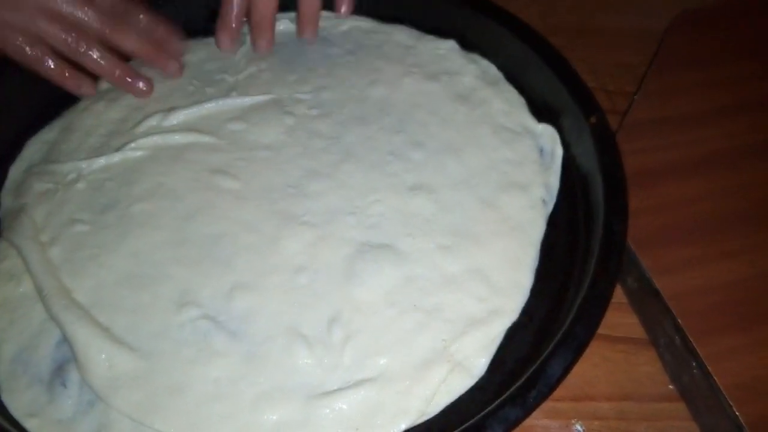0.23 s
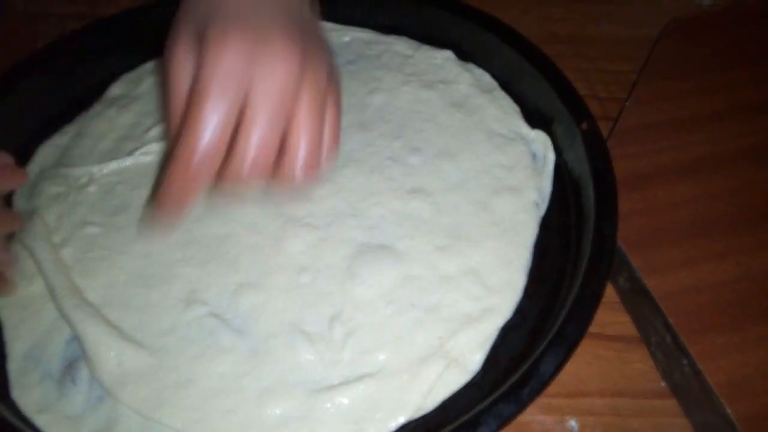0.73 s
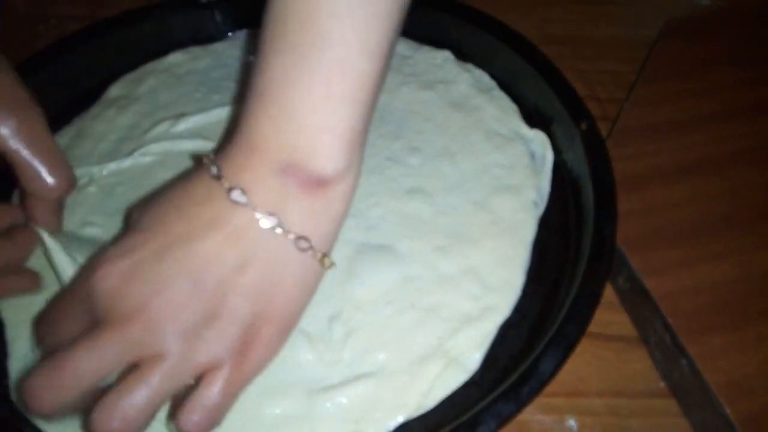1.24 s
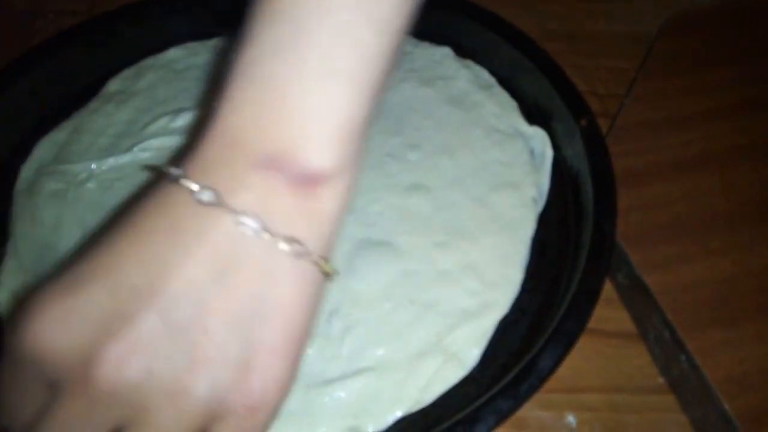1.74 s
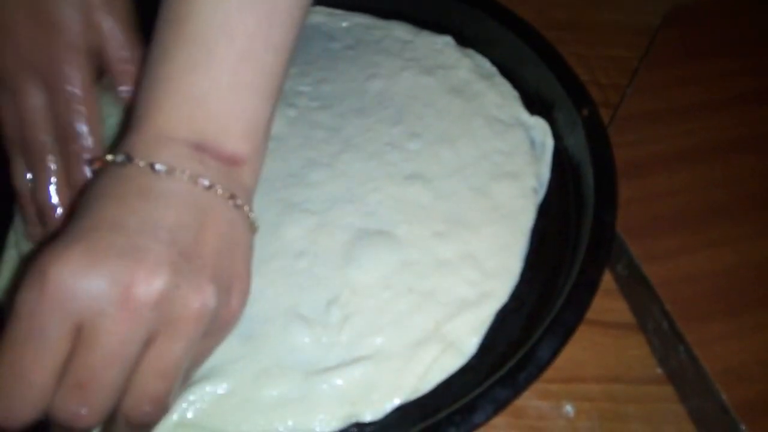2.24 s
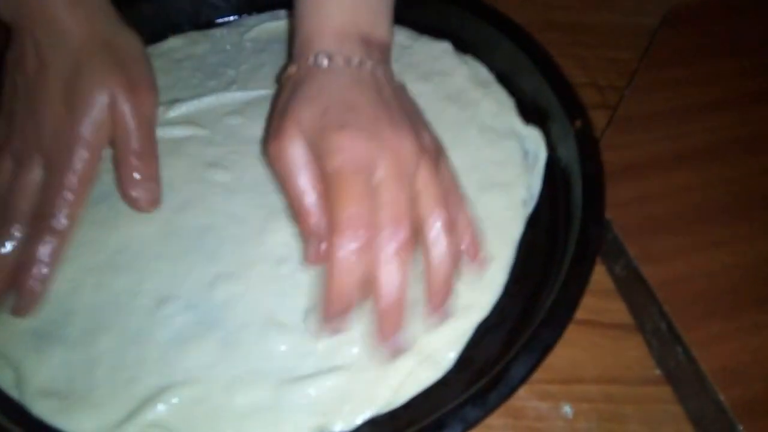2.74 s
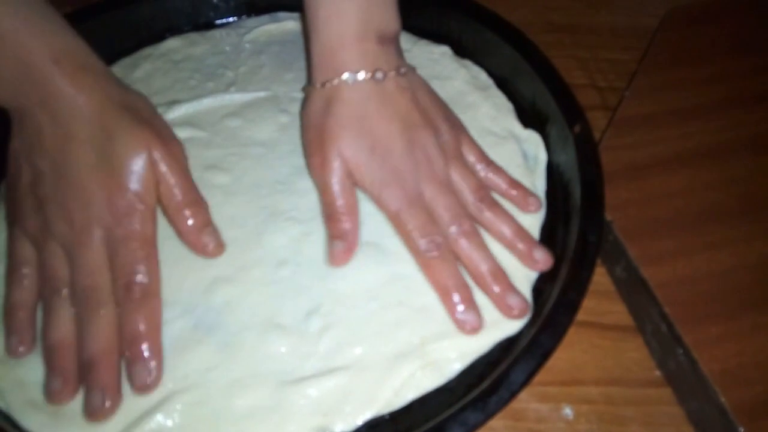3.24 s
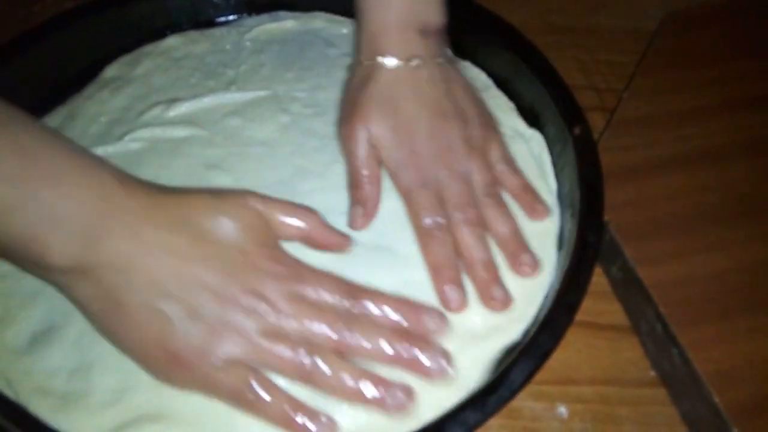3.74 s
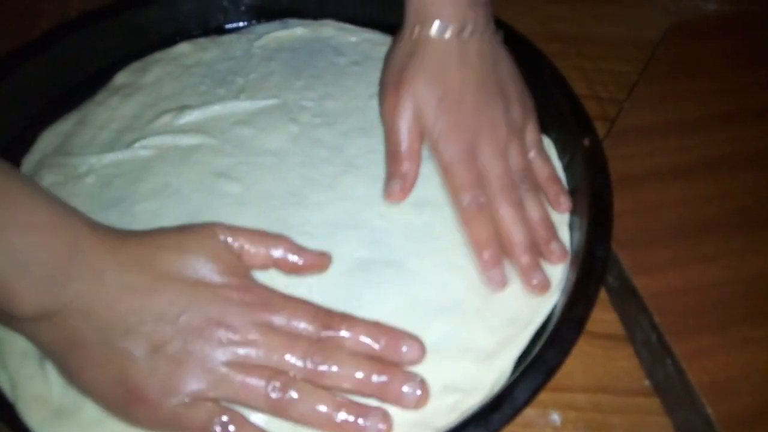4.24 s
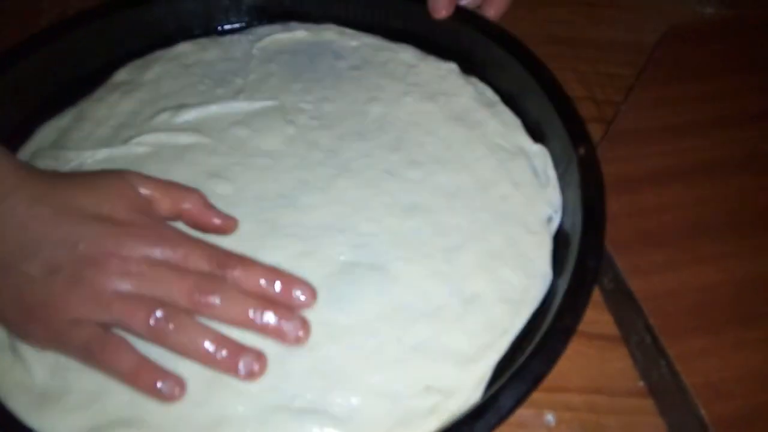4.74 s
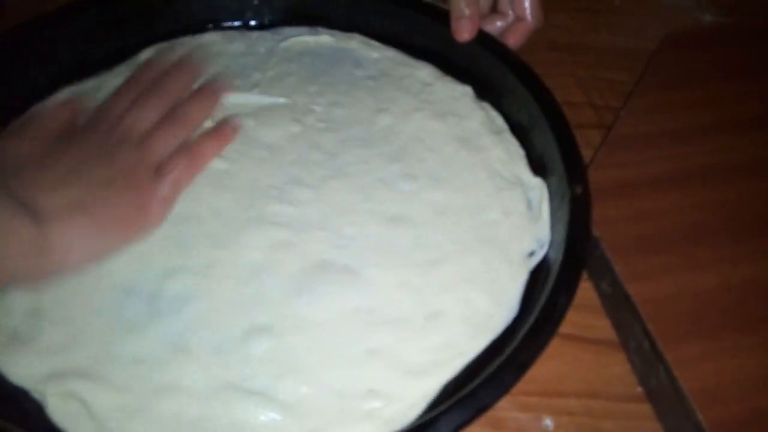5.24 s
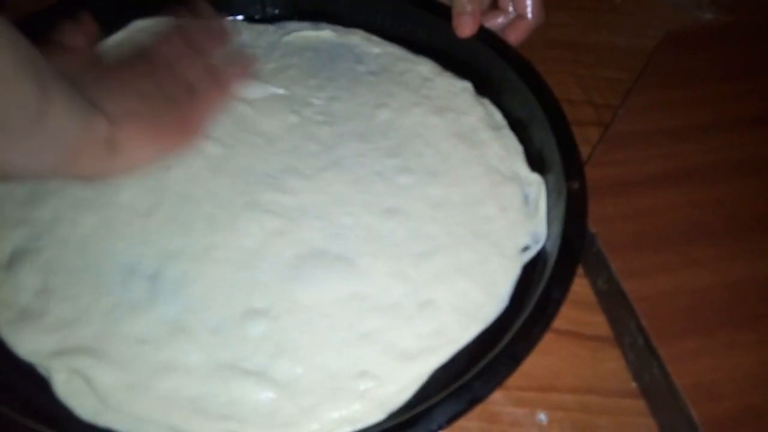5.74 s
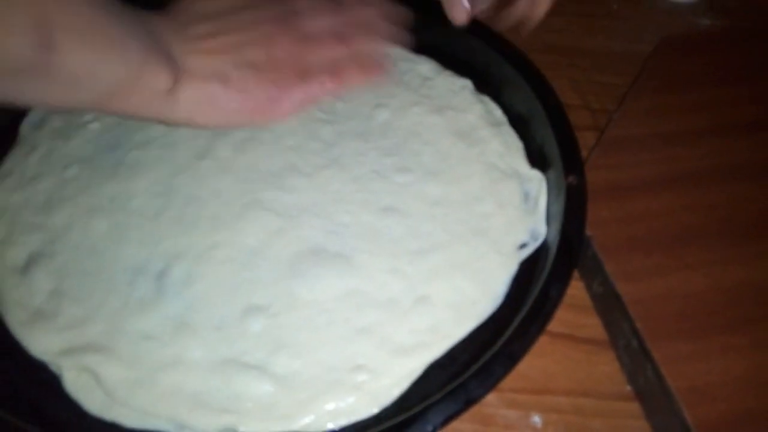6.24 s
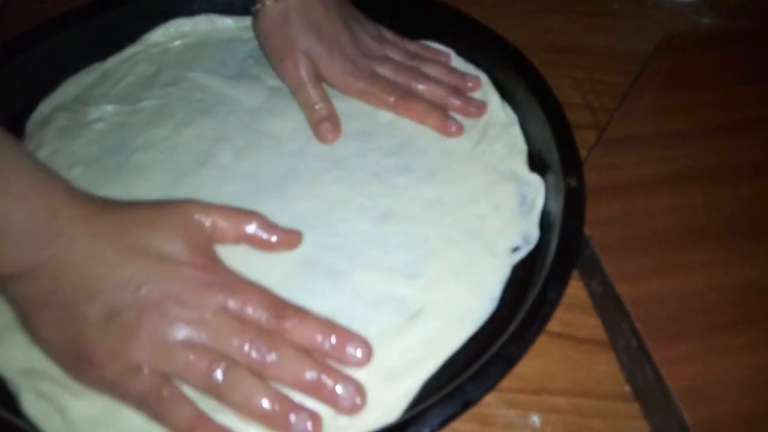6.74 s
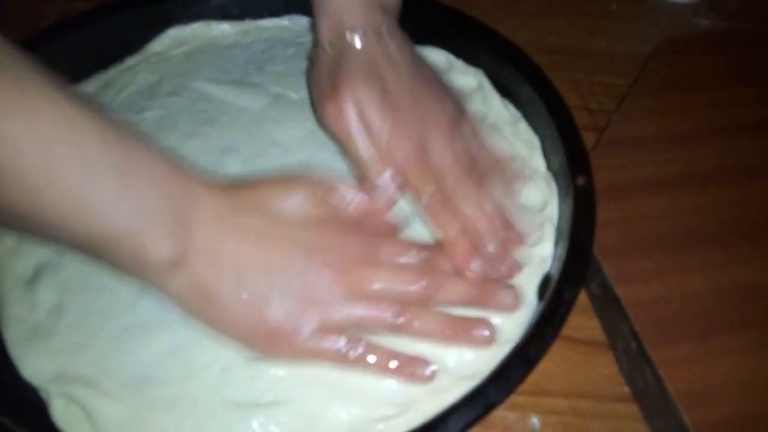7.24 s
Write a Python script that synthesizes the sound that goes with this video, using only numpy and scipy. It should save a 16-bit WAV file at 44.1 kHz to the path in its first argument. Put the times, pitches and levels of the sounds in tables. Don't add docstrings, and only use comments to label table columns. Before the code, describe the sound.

Close, muffled phone sound over a faint room rumble and hiss. Quiet fingertip taps and soft dough presses come first, spaced out. Then brisk, hollow, wet slaps snap from cupped oily palms, each with a low wooden and metallic thump and a brief bright room echo. A dense flurry gives way to uneven pats, small sticky snaps, one tiny bracelet clink and a last firm slap.

```python
import sys
import numpy as np
from scipy import signal
from scipy.fft import rfft, irfft
from scipy.io import wavfile

SR = 44100
rng = np.random.default_rng(int(sys.argv[2]) if len(sys.argv) > 2 else 0)


def materialize(psi):
    bounded = np.clip(np.atleast_2d(psi).T, -1, 1)
    quanta = np.round(bounded * 32767).astype(np.int16)
    wavfile.write(sys.argv[1], SR, quanta)


def volts(x):
    e = np.asarray(x, float) / 20
    return 10 ** e


N = 330597


def at_hz(points, hz):
    points = np.array(points)
    return np.interp(np.log(hz), np.log(points[:, 0]), points[:, 1])


def rms_one(x):
    return x / np.sqrt(np.mean(x ** 2) + 1e-20)


def band(x, low_hz, high_hz):
    return signal.sosfilt(signal.butter(2, [low_hz, high_hz], "band", fs=SR, output="sos"), x)


def resonance(x, hz, width_hz):
    r = np.exp(-np.pi * width_hz / SR)
    poles = [1, -2 * r * np.cos(2 * np.pi * hz / SR), r * r]
    return signal.lfilter([(1 - r * r) / 2, 0, (r * r - 1) / 2], poles, x)


def ring(force, hz, t60_s):
    r = volts(-60 / (t60_s * SR))
    w = 2 * np.pi * hz / SR
    return signal.lfilter([0, np.sin(w)], [1, -2 * r * np.cos(w), r * r], force + 1e-18)


def add(track, start_s, piece):
    i = round(start_s * SR)
    track[i:i + len(piece)] += piece[:N - i]


def contacts():
    # start in seconds, cupped-air level in dB, sharp level in dB,
    # cupped-air pitch in Hz, squirt length in seconds.
    palm_slaps = [(2.8343, -41.5, -34, 1670, 0.0063), (3.5273, -27.5, -20.5, 1690, 0.0034),
                  (3.7727, -25, -15, 1300, 0.003), (4.019, -25.5, -16, 980, 0.00046),
                  (4.2406, -26, -20, 1000, 0.0084), (4.4801, -34.5, -24.5, 1820, 0.0072),
                  (4.4927, -21.5, -19, 1340, .0012), (4.626, -19, -10.5, 1170, 0.00087),
                  (4.667, -24.5, -13, 1190, 0.0029), (4.6986, -27.5, -26, 1120, 0.0024),
                  (4.861, -37, -33.5, 1200, 0.0026), (4.9415, -21.5, -37, 1860, 0.00071),
                  (5.0814, -35, -26.5, 1180, .0021), (5.3406, -25, -26, 1404, 0.0021),
                  (5.5017, -30.5, -24, 1840, 0.0018), (5.6, -27, -25.5, 1220, .002),
                  (5.7505, -29.5, -23, 1690, 0.003), (5.8533, -26.5, -16.5, 1240, 0.0016),
                  (6.0006, -35, -34.5, 1780, 0.0007), (6.0826, -34, -31, 1650, 0.0082),
                  (6.5035, -35, -24.5, 1660, 0.0063), (6.7466, -35.5, -28.5, 2000, 0.0032),
                  (7.052, -31, -26, 1760, 0.0036), (7.3145, -21.5, -13, 1210, 0.00082)]
    # start in seconds, cupped-air level in dB,
    # sharp level in dB, cupped-air pitch in Hz.
    finger_taps = [(0.3293, -55, -54, 1870), (1.1475, -47.5, -49, 1480), (1.916, -45.5, -42, 1500),
                   (2.53, -46, -43.5, 1530), (3.24, -50, -63.5, 2380), (3.897, -54, -38.5, 1390),
                   (4.262, -26.5, -35, 970), (4.4028, -38, -35, 1700), (4.6194, -31, -44, 1100),
                   (4.6344, -18.5, -22, 1000), (4.7173, -29.5, -34.5, 980), (4.8908, -43.5, -41, 1224),
                   (4.912, -54, -55, 1210), (4.951, -36.5, -38, 1790), (5.11, -48, -56, 1240),
                   (5.3258, -38.5, -37, 1420), (5.4933, -37.5, -28, 2330), (5.5787, -40.5, -50, 1050),
                   (5.7046, -40.5, -29.5, 1820), (5.7837, -36.5, -53, 1960), (5.8252, -36, -30.5, 1800),
                   (5.945, -40, -60, 1410), (6.2276, -44.5, -60, 1320), (6.5069, -42, -32, 1230),
                   (6.556, -37.5, -41, 1610), (6.7855, -39.5, -42, 1410), (6.9581, -39, -60, 1280),
                   (6.983, -45, -60, 1420), (7.2476, -37.5, -43.5, 1280), (7.444, -50.5, -51, 1070)]
    # start in seconds, level in dB, pitch in Hz.
    oil_snaps = [(0.5751, -45.5, 4860), (0.7248, -53.5, 3870), (2.387, -51, 4570), (2.953, -45.5, 2960),
                 (3.005, -46.5, 3960), (3.0907, -43.5, 3760), (3.259, -38.5, 5030), (3.2903, -40, 3500),
                 (3.67, -49, 5040), (3.943, -48, 3240), (4.128, -47.5, 4900), (4.152, -46, 4820),
                 (4.2705, -31.5, 4430), (4.3144, -45, 3510), (6.1998, -47, 4470), (6.2397, -49, 4890),
                 (6.2593, -47, 4600), (6.5127, -28.5, 4700), (6.6076, -39, 3500), (6.6413, -41, 5150),
                 (6.7518, -28.5, 4060), (6.8394, -43, 3150), (6.8662, -42, 4520), (6.8846, -41, 4260),
                 (6.9143, -51, 5060), (7.0644, -34, 5340), (7.206, -34.5, 3870), (7.3844, -46, 3400),
                 (7.4674, -39.5, 4330)]
    finger_squirt_s, snap_squirt_s = 0.0031, 0.0017
    lead_s, lead_db = 0.0028, -22
    rows = [tuple(row) for row in palm_slaps]
    rows += [tuple(row) + (finger_squirt_s,) for row in finger_taps]
    for s, cup_db, sharp_db, hz, _ in palm_slaps:
        rows.append((s - lead_s, cup_db + lead_db, sharp_db + lead_db, hz, finger_squirt_s))
    for s, db, hz in oil_snaps:
        rows.append((s, db - 11.5, db - 1.5, hz, snap_squirt_s))
    s, cup_db, sharp_db, cup_hz, squirt_s = np.transpose(rows)
    wall_power = volts(cup_db + 4.5) ** 2 + volts(sharp_db - 0.5) ** 2
    wall_db = 0.76 * 10 * np.log10(wall_power)
    return np.transpose([s, wall_db, cup_db, sharp_db, cup_hz, squirt_s])


def landings():
    # start in seconds, heel weight into the table in dB,
    # knock on the tray in dB, palm smack in dB.
    soft_presses = [(.004, -60, -70, -33.5), (0.325, -41.5, -43.5, -49), (0.526, -58, -58.5, -35),
                    (1.146, -55, -52.5, -38), (1.365, -55, -61, -40), (1.916, -49.5, -51.5, -35),
                    (2.05, -57, -60.5, -63), (2.397, -53.5, -60, -41), (2.528, -51, -49, -36),
                    (2.751, -42.5, -56, -37), (2.835, -40.5, -40, -33.5), (2.901, -50, -44, -37),
                    (2.955, -50, -50, -49), (3.045, -49.5, -48.5, -51), (3.253, -39.5, -33.5, -22.5),
                    (3.9, -40, -42, -29.5), (4.402, -37.5, -43.5, -24), (4.859, -40, -46.5, -38),
                    (5.081, -40, -43, -36), (5.139, -58, -51, -38), (5.949, -49, -41.5, -34),
                    (6.128, -49, -39, -39), (6.226, -54, -44.5, -29.5), (6.306, -48, -50, -46),
                    (7.161, -54, -46.5, -24), (2.321, -70, -59.5, -41), (3.744, -43, -52, -50),
                    (5.299, -55, -59, -34), (6.691, -44, -54, -50), (6.91, -49, -49, -34)]
    # start in seconds, heel weight in dB, knock on the tray
    # in dB, palm smack in dB, shake of the rim in dB.
    outer_bout_pats = [(3.523, -30.5, -38.5, -17, -34.5), (3.771, -30.5, -37, -17.5, -36.5),
                       (4.014, -33.5, -30, -6, -26), (4.24, -31, -26, -5, -26), (4.483, -31, -31, -38, -30),
                       (4.493, -36.5, -24, -6.5, -27), (4.62, -28.5, -25, .5, -24.5),
                       (4.666, -30, -25, -7.5, -31), (4.699, -38.5, -37, -11, -30.5),
                       (4.726, -37, -32, -13.5, -39), (4.936, -42, -29.5, -17.5, -36),
                       (6.507, -33.5, -26.5, -12, -25.5), (6.748, -33, -33, -16.5, -38),
                       (6.959, -44.5, -37.5, -21, -41), (6.989, -40, -35.5, -32, -40.5),
                       (7.052, -37, -36, -21.5, -37), (7.204, -37.5, -37.5, -26, -44),
                       (7.245, -37, -34.5, -20.5, -41), (7.309, -35, -24, -25, -32.5)]
    # start in seconds, heel weight in dB, knock on the tray in dB,
    # palm smack in dB, shake of the rim in dB.
    middle_bout_pats = [
        (5.327, -39, -33.5, -22, -42),
        (5.353, -47.5, -34, -23, -50),
        (5.499, -35, -41, -39, -43.5),
        (5.595, -38, -31, -31, -39),
        (5.748, -33, -40, -20, -42),
        (5.837, -32, -22.5, -12, -28),
        (5.997, -35, -39.5, -20.5, -39),
        (6.09, -39, -25.5, -20, -35.5),
    ]
    rows = []
    for s, heel_db, knock_db, smack_db in soft_presses:
        rim_db = 0.65 * knock_db + (1 - 0.65) * smack_db - 9.5
        rows.append((s, heel_db, knock_db, smack_db, rim_db))
    rows += [tuple(row) for row in outer_bout_pats] + [tuple(row) for row in middle_bout_pats]
    s, table_db, tray_db, smack_db, rim_db = np.transpose(rows)
    sag_db = 0.61 * table_db + (1 - 0.61) * tray_db + 1.2
    return np.transpose([s, smack_db, table_db, sag_db, tray_db, rim_db])


def own_hiss():
    # frequency in Hz, density in dB
    # per Hz.
    noise_density = [(15, -48.5), (25, -12), (82, 0), (157, -0.5), (236, -4.5), (476, -11), (659, -13),
                     (911, -14.5),
                     (2910, -17.5), (3620, -16), (6380, -24), (8140, -35.5), (13600, -39), (14800, -27.5),
                    (15600, -29.5), (15850, -57.5)]
    hz = np.maximum(np.fft.rfftfreq(N, 1 / SR), 1)
    colour = volts(at_hz(noise_density, hz))
    return volts(-59.5) * rms_one(irfft(rfft(rng.standard_normal(N)) * colour, N))


def kitchen():
    # frequency in Hz, t60 in seconds, density in dB per Hz.
    wall_answer = np.array([(700, 0.52, -31.5), (1500, 0.34, -28), (3070, 0.33, -28), (5300, 0.18, -43),
                            (6540, 0.18, -39.5), (8100, 0.33, -36)])
    delay_s, build_s = 0.0033, 0.0006
    tilt, patchy_db = 0.1, 2.5
    rows = contacts()
    at = np.minimum(((rows[:, 0] + delay_s) * SR).astype(int), N - 1)
    bright_db = np.clip(rows[:, 3] - rows[:, 2] - 4, -10, 10)
    build = np.exp(-1 / (build_s * SR))
    edges_hz = 500 * 2 ** np.arange(0, 4.6, 0.5)
    white = rng.standard_normal((2, N))
    knots = np.arange(N // 400 + 2)
    out = np.zeros(N)
    for k, (low_hz, high_hz) in enumerate(zip(edges_hz, edges_hz[1:])):
        hz = np.sqrt(low_hz * high_hz)
        energy = np.full(N, 1e-18)
        energy[at] = volts(rows[:, 1] + tilt * bright_db * np.log2(hz / 2500)) ** 2
        fade = volts(-120 / (at_hz(wall_answer, hz) * SR))
        left = signal.lfilter([1 - build], np.convolve([1, -build], [1, -fade]), energy)
        clumps = np.interp(np.arange(N) / 400, knots, rng.standard_normal(len(knots)))
        gain = volts(at_hz(wall_answer[:, ::2], hz) + patchy_db * clumps)
        out += gain * np.sqrt(left) * band(white[k % 2], low_hz, high_hz)
    return volts(7.5) * out


def clink():
    # frequency in Hz, level in dB, t60 in seconds.
    bracelet_modes = [(1650, -0.5, 0.27), (3120, -1, 0.073), (4700, -18, 0.076)]
    touch = np.zeros(N)
    add(touch, 6.259, volts([-54]))
    return sum(volts(level_db) * ring(touch, hz, t60_s) for hz, level_db, t60_s in bracelet_modes)


def peel():
    # strongest moment in seconds, hiss level in dB,
    # time to swell or fade 20 dB in seconds (zero or less: shortest).
    palm_lifts = [(2.51, -59.5, -0.6), (2.8, -63.5, 0.16), (3.628, -63.5, 0.46), (3.88, -47, 0.06),
                  (4.114, -70, 0.5), (4.37, -45, 0.03), (4.6, -54, -3), (4.9, -72.5, 0.8), (5.17, -66.5, 4),
                  (5.4, -48.5, -2), (5.56, -52, -0.6), (5.72, -57.5, 0.16), (5.95, -59, -2),
                  (6.18, -55, -1.6), (6.27, -54, -0.37), (6.6, -63, -2), (6.846, -60.5, -0.3),
                  (7.09, -48.5, -0.16), (7.45, -60, 1.5)]
    ticks_per_s, tick_db = 130, -2
    t = np.arange(N) / SR
    sizes = volts(1.33 * np.minimum(rng.exponential(1, N), 5)) * rng.choice([-1, 1], N)
    ticks = sizes * (rng.random(N) < ticks_per_s / SR)
    film = rms_one(rng.standard_normal(N)) + volts(tick_db) * rms_one(ticks)
    coarse_t = t[::64]
    pull = np.zeros(len(coarse_t))
    for s, db, fade_s in palm_lifts:
        pull += volts(db - 20 * np.abs(coarse_t - s) / max(fade_s, 0.02)) ** 2
    return volts(-1) * np.interp(t, coarse_t, np.sqrt(pull)) * rms_one(band(film, 2130, 11300))


def smacks():
    rise_s, fall_s = 0.0015, 0.027
    out, rows = np.zeros(N), landings()
    t = np.arange(3000) / SR
    shape = (1 - np.exp(-t / rise_s)) ** 2 * np.exp(-t / fall_s)
    for row, noise in zip(rows, rng.standard_normal((len(rows), 3000))):
        add(out, row[0], volts(row[1] - 31.5) * rms_one(band(noise * shape, 260, 1300)))
    return out


def thuds():
    # frequency in Hz, level in dB, t60 in seconds.
    table_modes = [(55.8, -2, 0.11), (67.4, -0.5, 0.25), (75.9, -1, 0.35), (89.7, 4, 0.16),
                   (105.6, -11, 0.08)]
    # frequency in Hz, level in dB, t60 in seconds.
    sag_modes = [(131, -4.5, 0.19), (150.6, -1.5, 0.25), (168.9, 0, 0.16)]
    # frequency in Hz, level in dB, t60 in seconds.
    tray_modes = [(184.8, -3.5, 0.16), (197.4, 0, 0.29), (214.4, -10.5, 0.33)]
    # frequency in Hz, level in dB, t60 in seconds.
    rim_modes = [(249.7, 4.5, 0.12), (276, -1.5, 0.2), (293.1, -0.5, 0.24), (330.8, 3, 0.16),
                 (371.6, -1.5, 0.17), (394, -5, 0.23), (447, -7, 0.21), (472.4, -7, 0.22),
                 (530.2, -10, 0.16), (634, -9.5, 0.12)]
    push_s = [0.0064, 0.0054, 0.0056, 0.0025]
    trim_db = [6.24, 6.7, 6.94, 0.37]
    out, rows = np.zeros(N), landings()
    t = np.arange(3500) / SR
    for part, modes in enumerate((table_modes, sag_modes, tray_modes, rim_modes)):
        u = t / push_s[part]
        for hz, level_db, t60_s in modes:
            force = np.zeros(N)
            luck = rng.standard_normal((len(rows), 3))
            for row, (gain, phase, detune) in zip(rows, luck):
                push_hz = hz * (1 + 0.069 * detune)
                lump = u * np.exp(-u) * np.sin(2 * np.pi * push_hz * t + 0.8 * phase)
                strength = volts(row[2 + part] + level_db + 1.96 * gain)
                add(force, row[0], lump / np.abs(lump).sum() * strength)
            out += volts(trim_db[part]) * ring(force, hz, t60_s)
    return out


def cracks():
    out, rows = np.zeros(N), contacts()
    t = np.arange(1500) / SR
    noise = rng.standard_normal((len(rows), 2, 1500))
    for (s, _, cup_db, sharp_db, cup_hz, squirt_s), (cup_noise, sharp_noise) in zip(rows, noise):
        squirt_s = np.clip(squirt_s, 0.0004, 0.007)
        cup = resonance(cup_noise * np.exp(-t / squirt_s), cup_hz, 530)
        burst = np.exp(-t / squirt_s / 0.92) + 2.4 * np.exp(-t / 0.00039)
        sharp = band(sharp_noise * burst, 3530, 17200)
        add(out, s, volts(cup_db - 12) * rms_one(cup) + volts(sharp_db - 17) * rms_one(sharp))
    return out


def scene():
    return (kitchen() + clink() + peel() + smacks() + thuds() + cracks())[None]


def top_cut(x):
    return signal.sosfilt(signal.butter(12, 16510, fs=SR, output="sos"), x)


def record(dry):
    lifted = dry + (volts(10) - 1) * resonance(dry, 4600, 940)
    dull = signal.sosfilt(signal.butter(12, 6244, fs=SR, output="sos"), lifted)
    leak = volts(-31) * signal.sosfilt(signal.butter(2, 10200, fs=SR, output="sos"), dry)
    heard = signal.sosfilt(signal.butter(4, 39.3, "high", fs=SR, output="sos"), dull + leak)
    heard = signal.sosfilt(signal.butter(10, 15800, fs=SR, output="sos"), heard)
    return top_cut(heard + own_hiss())


dry = scene()
out = record(dry)
materialize(out)
```